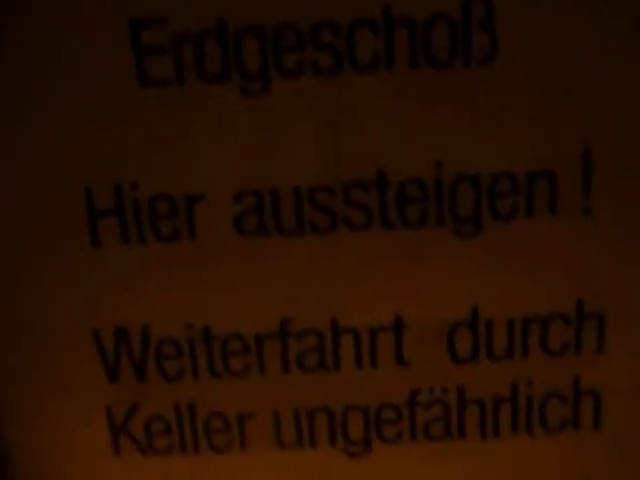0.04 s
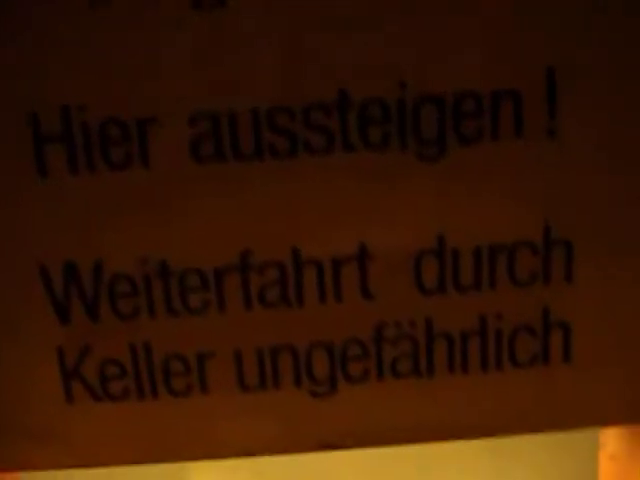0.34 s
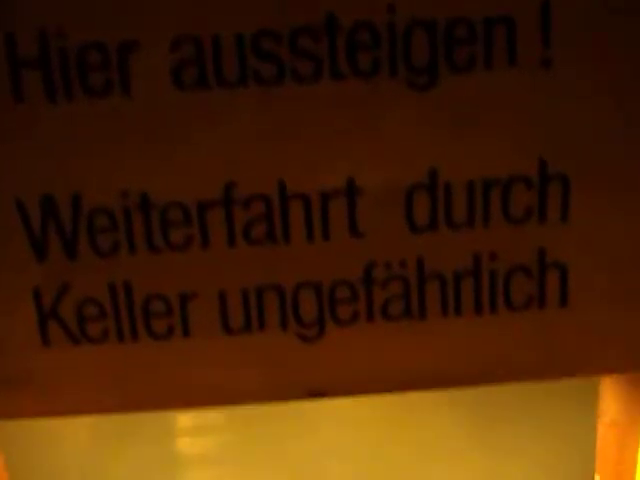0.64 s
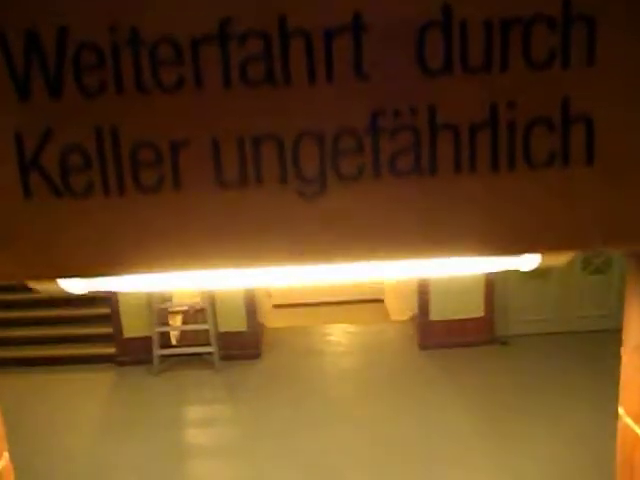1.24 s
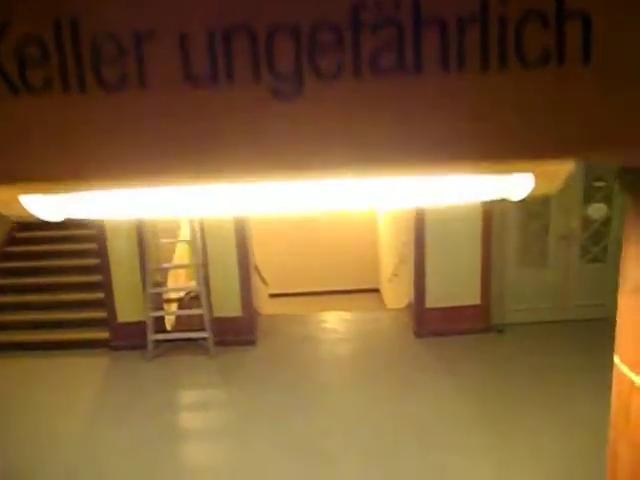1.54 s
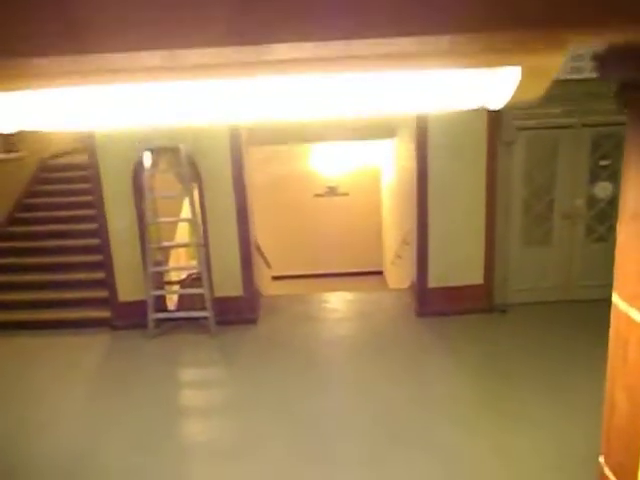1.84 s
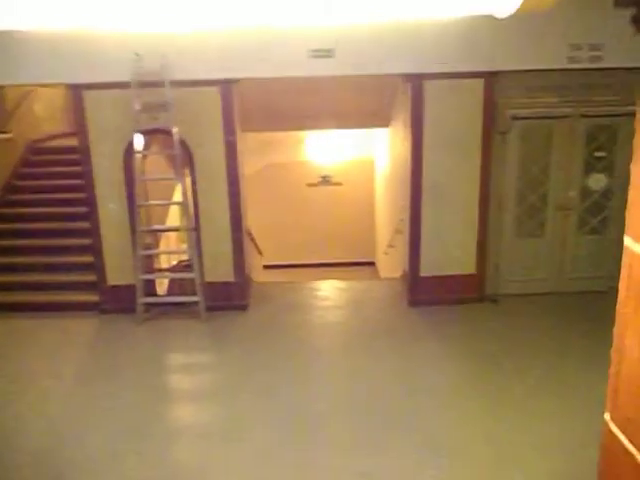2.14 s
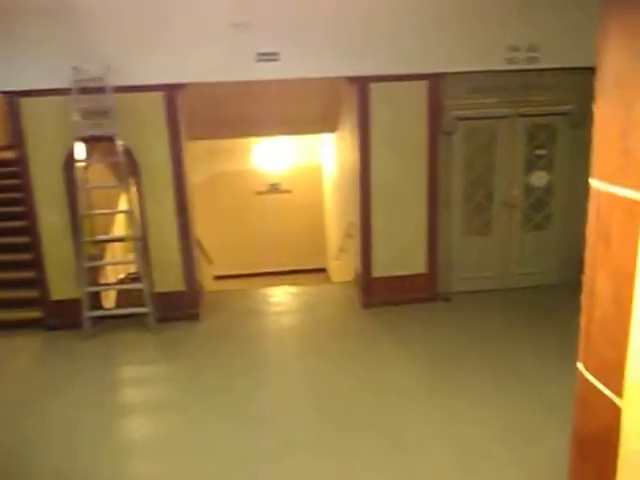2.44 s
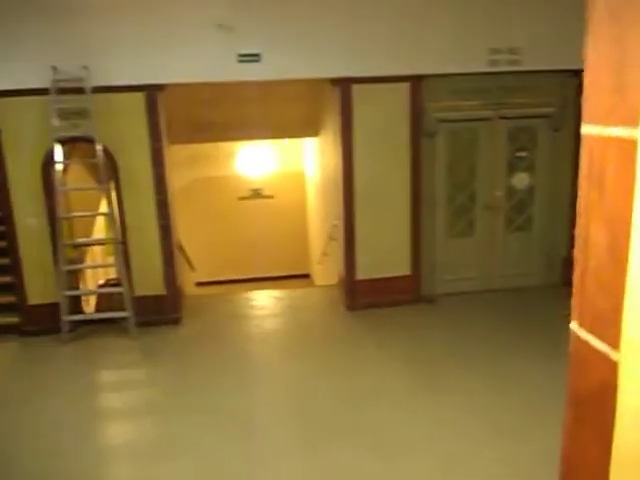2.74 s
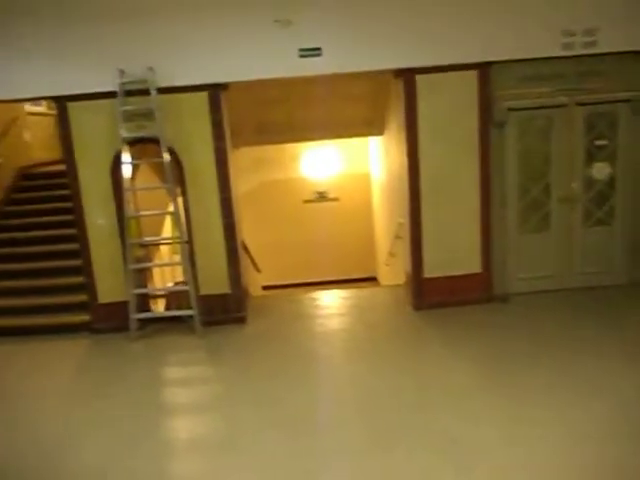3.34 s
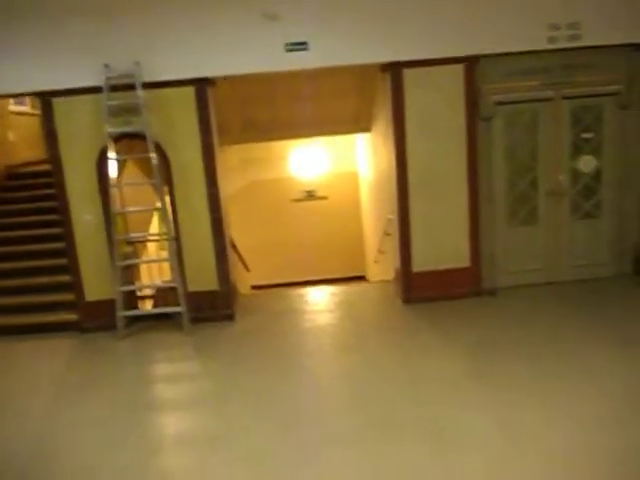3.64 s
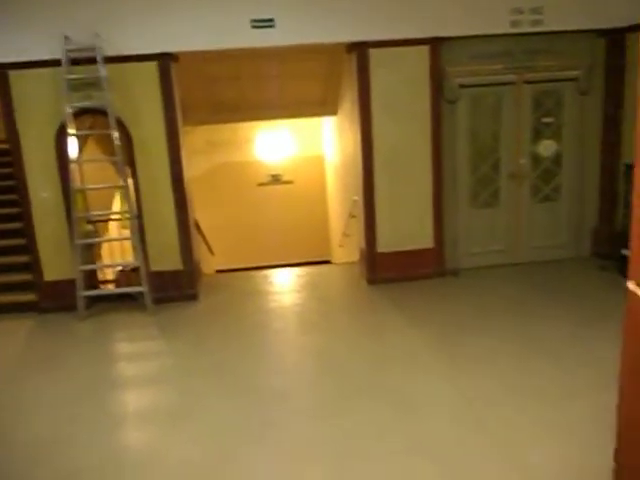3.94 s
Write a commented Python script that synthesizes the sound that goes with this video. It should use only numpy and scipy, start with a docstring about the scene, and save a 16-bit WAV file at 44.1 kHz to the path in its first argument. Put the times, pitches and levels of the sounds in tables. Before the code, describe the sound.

An open wooden lift rumbles and rattles steadily, heard from inside the cabin. Distant knocks echo in the shaft, then the cabin thuds in its guides, with faint scuffs and one dry snap close by near the end.

```python
"""Riding an open wooden lift

The microphone is in the cabin of a continuously running lift, passing a stone hall. The swaying cabin
rumbles, chain and guides rattle, and the drive whines faintly. Distant knocks echo down the shaft, then
the cabin itself thuds in its guides. Close by are short scuffs, a snap and two faint squeaks over a
soft hiss; the camera adds a thin buzz and three ticks."""
import sys
import numpy as np
from scipy import signal
from scipy.fft import rfft, irfft
from scipy.io import wavfile
from scipy.ndimage import uniform_filter1d

SR = 44100
rng = np.random.default_rng(int(sys.argv[2]) if len(sys.argv) > 2 else 0)


def unload_audio(sound):
    """Save the sound as a 16-bit wav file, at the path given as the first command line argument."""
    columns = np.transpose(np.atleast_2d(sound))
    # keep every value between -1 and 1, then stretch to whole-number steps
    steps = np.round(np.clip(columns, -1, 1) * 32767)
    wavfile.write(sys.argv[1], SR, steps.astype(np.int16))


N = 176400
TIME = np.arange(N) / SR
BIN_HZ = np.arange(N // 2 + 1) * SR / N

# How the continuous sounds rise and fall. Each row: time in seconds, relative level in dB.
HISS_LEVELS = [(0, -62), (1.5, -61.5), (1.65, -59.5), (2.0, -59), (2.25, -55.5), (2.6, -57), (2.9, -58.5),
               (3.1, -60), (3.2, -56), (3.5, -60), (3.7, -58), (4, -56)]
WHINE_LEVELS = [(0, -67), (.1, -58.5), (.5, -65.5), (.8, -63), (1.15, -55), (1.25, -64), (1.8, -61),
                (2.2, -63.5), (2.45, -52.5), (2.56, -71), (2.9, -59), (3.2, -73), (4, -76)]
RATTLE_LEVELS = [(0, -40.5), (.8, -43), (1.25, -39), (1.45, -41), (1.95, -37.5), (2.4, -37.5), (2.9, -38),
                 (3.1, -40.5), (3.5, -34), (4, -33)]
SWAY_LEVELS = [(0, -20.5), (.07, -20), (.3, -21), (.47, -25.5), (.57, -13.5), (.69, -32.5), (.77, -21),
               (1.05, -24.5), (1.17, -20), (1.45, -27), (1.52, -21), (2.02, -24), (2.1, -24), (2.27, -20),
               (2.35, -17), (2.44, -19.5), (2.75, -21), (3.14, -25), (3.2, -13.5), (3.55, -15.5), (4, -23)]

# The colour of each noise at the microphone. Each row: frequency in Hz, relative density in dB.
HISS_SPECTRUM = [(500, 9.5), (1500, -1.5), (2200, 0.5), (4000, 0), (6800, -0.5), (8500, -5), (10500, -7),
                 (12000, -21.5)]
SCUFF_SPECTRUM = [(400, -29), (1200, 2), (1900, -0.5), (2800, 6), (4000, 5), (5000, 2.5), (7000, 1.5),
                  (9000, -9), (11500, -28.5)]
SNAP_SPECTRUM = [(600, 6), (1500, -3.5), (2800, 2), (4000, 3.5), (5000, -0.5), (7300, -2.5), (8800, -15),
                 (11500, -24)]
HALL_SPECTRUM = [(800, -1), (1600, -1), (2400, 5.5), (4000, 1), (7000, -1.5), (8200, -14), (11000, -26)]
RATTLE_SPECTRUM = [(45, -22), (75, -0.5), (100, 2), (125, -8), (155, 1), (200, -5.5), (260, -5.5),
                   (320, -11.5), (420, -12), (550, -20.5), (1000, -25), (1400, -38), (2500, -49)]
SWAY_SPECTRUM = [(12, -5.5), (20, -0.5), (27, 3), (33, -2), (39, -1.5), (48, 1.5), (57, -0.5), (66, -15),
                 (80, -25), (200, -77)]
CLACK_SPECTRUM = [(150, -15), (400, 3.5), (600, 5.5), (700, 4), (800, 11), (900, 1.5), (1100, 2.5),
                  (1400, -13.5), (1900, -24.5), (3300, -22), (7000, -39)]
BOOM_SPECTRUM = [(80, -8), (160, -6.5), (270, 0), (390, -5.5), (520, -14.5), (900, -25), (1500, -41)]
FRAME_SPECTRUM = [(30, -20), (60, -1), (85, 0), (125, -14), (160, -9.5), (210, -18), (400, -34), (900, -55)]
PANEL_SPECTRUM = [(90, -7.5), (160, 0.5), (260, 1.5), (370, -1.5), (550, -11), (900, -18), (1500, -32.5),
                  (3000, -44)]

# The camera's buzz. Each row: frequency in Hz, level in dB while switched on.
BUZZ_TONES = [(10590, -87), (10750, -71), (11305, -78.5)]
# Electrical ticks. Each row: start in seconds, step height in dB before softening.
CAMERA_TICKS = [(3.2084, -13.5), (3.2126, -17), (3.3088, -24)]
# The motor's steady tones. Each row: frequency in Hz, level in dB, pitch wander in Hz.
MOTOR_TONES = [(152, -48, 6.11), (377.7, -60, 4), (2457, -84, 8.6)]
# Two squeaks close by, one list for each. Each row: time in seconds, pitch in Hz.
SQUEAK_GLIDES = [
    [(0, 8040), (.13, 8050), (.16, 9300), (.185, 9100), (.22, 7750), (.29, 7300), (.37, 6150)],
    [(2.47, 8160), (2.55, 8400), (2.63, 8200), (2.76, 8900), (2.82, 9900), (2.87, 8000)],
]
# Scuffs close by. Each row: start in seconds, level in dB, rise in seconds, time to fall 60 dB in
# seconds, tilt in dB per octave.
NEAR_SCUFFS = [(1.555, -44.5, 0.0015, 0.12, 15.5), (1.84, -46.5, 0.029, 0.16, 2),
               (2.056, -45, 0.026, 0.2, 4), (2.32, -46.5, 0.052, 0.12, 2), (2.705, -47.5, 0.01, 0.28, -2),
               (3.237, -45, 0.029, .11, -1), (3.409, -45, 0.0073, 0.19, -2.5),
               (3.759, -43.5, 0.0025, .07, 2), (3.768, -45, 0.026, 0.17, 1)]
# Knocks far off in the shaft. Each row: start in seconds, clack level in dB, boom level in dB.
SHAFT_KNOCKS = [(-.08, -60, -42), (0.226, -39.5, -29), (0.546, -44, -36.5), (0.883, -38, -31),
                (1.19, -53, -36.5), (1.602, -47.5, -39.5), (2.223, -51, -33.5), (2.70, -73, -38.5),
                (3.162, -43, -71), (3.30, -63, -34.5), (3.501, -40, -33), (3.834, -39, -40),
                (3.935, -44, -52)]
# The shaft's ring after every knock. Each row: frequency in Hz, relative level in dB, half-width in Hz.
SHAFT_RESONANCES = [(189.5, -7.5, 13), (250.7, -5.5, 21), (297, -8, 6.8), (372.6, -4.5, 21),
                    (432, -12.5, 20)]
# The cabin's thuds. Each row: start in seconds, frame level in dB, panel level in dB, rise in seconds.
CABIN_THUDS = [(1.603, -49, -30.5, 0.016), (2.054, -26.5, -27.5, 0.0072), (2.297, -27, -38, 0.011),
               (2.56, -31.5, -50, 0.026), (2.73, -36.5, -39.5, 0.016), (2.93, -24, -45, 0.023),
               (3.178, -23, -33, 0.017), (3.264, -26.5, -53, 0.022), (3.341, -20.5, -32.5, 0.018),
               (3.415, -25.5, -33, 0.018), (3.67, -28, -44, .015), (3.789, -29, -41, 0.018)]


def from_db(db):
    """Decibels to gain."""
    return 10 ** (np.asarray(db) / 20)


def level(rows):
    """Gain over time through (seconds, dB) points."""
    return from_db(np.interp(TIME, *np.transpose(rows)))


def shaped_noise(gain):
    """Noise of unit RMS, weighted by one gain for each frequency bin."""
    x = irfft(rfft(rng.standard_normal(N)) * gain, N)
    return x / np.sqrt(np.mean(x ** 2) + 1e-20)


def noise(spectrum, tilt_db=0):
    """Unit noise of the given colour, tilted per octave and falling away beyond the table's ends."""
    hz, db = np.transpose(spectrum)
    octave, points = np.log2(np.maximum(BIN_HZ, 1)), np.log2(hz)
    octaves_outside = np.abs(octave - np.clip(octave, points[0], points[-1]))
    colour_db = np.interp(octave, points, db) + tilt_db * octave - 20 * octaves_outside
    return shaped_noise(from_db(colour_db))


def resonance(centre_hz, half_width_hz):
    """Unit noise ringing in one resonance."""
    return shaped_noise(1 / (1 + ((BIN_HZ - centre_hz) / half_width_hz) ** 2))


def drift(rate_hz):
    """Random wander of unit RMS, mostly slower than the given rate."""
    return resonance(0, rate_hz)


def even(x, window_s=0.039):
    """Hold a noise near unit level by ironing out its slow swells."""
    size = int(window_s * SR)
    power = uniform_filter1d(uniform_filter1d(x ** 2, size), size)
    return x / np.sqrt(power + 1e-9)


def swell(start_s, rise_s, t60_s):
    """A straight rise, then an exponential decay of 60 dB in t60_s."""
    age = TIME - start_s
    return np.clip(age / rise_s, 0, 1) * from_db(-60 * np.maximum(age - rise_s, 0) / t60_s)


def gate(clock, start_s, end_s, edge_s):
    """Open between start and end, with a straight fade at each edge."""
    return np.clip(np.minimum(clock - start_s, end_s - clock) / edge_s, 0, 1)


def tone(hz, wander_hz, rate_hz=12.8):
    """A sine of unit RMS whose pitch wanders at random."""
    pitch = hz + wander_hz * drift(rate_hz)
    return np.sqrt(2) * np.sin(2 * np.pi * np.cumsum(pitch) / SR)


def hiss():
    """A soft, wide hiss behind everything, a little louder in the second half."""
    return level(HISS_LEVELS) * noise(HISS_SPECTRUM)


def camera_buzz(rate_hz=40.74, duty=0.57):
    """Right at the microphone, the camera's thin, high tones switch on and off in a fast cycle."""
    age = (TIME - 0.006) % (1 / rate_hz)
    tones = sum(np.sqrt(2) * from_db(db) * np.sin(2 * np.pi * hz * age) for hz, db in BUZZ_TONES)
    return gate(age, 0, duty / rate_hz, edge_s=0.0025) * tones


def camera_ticks(decay_s=0.00043, soften_hz=7000):
    """Three electrical ticks from the camera, each a sudden step that leaks away."""
    steps = np.zeros(N)
    for start, db in CAMERA_TICKS:
        steps[int(start * SR)] = from_db(db)
    ticks = signal.lfilter([1], [1, -np.exp(-1 / (decay_s * SR))], steps + 1e-18)
    return signal.lfilter(*signal.butter(1, soften_hz, fs=SR), ticks)


def drive():
    """The drive, faint from the cabin: the motor's tones waver and the gear whine comes and goes."""
    motor = sum(from_db(db + 2 * drift(5.1)) * tone(hz, wander) for hz, db, wander in MOTOR_TONES)
    gears = level(WHINE_LEVELS) * tone(hz=929, wander_hz=1.88)
    return motor + gears


def squeaks(level_db=-72.5, flicker_db=3.5):
    """Faint, unsteady high tones close by that glide up and fall away."""
    sound = np.zeros(N)
    for glide in SQUEAK_GLIDES:
        times, hz = np.transpose(glide)
        squeak = tone(np.interp(TIME, times, hz), wander_hz=90, rate_hz=88)
        gain = from_db(level_db + flicker_db * drift(22))
        sound += gate(TIME, times[0], times[-1], edge_s=0.03) * gain * squeak
    return sound


def scuffs(grain_db=1.5):
    """Short rubs near the microphone, made grainy by a fast flicker in level."""
    rubs = sum(from_db(db) * swell(start, rise, t60) * noise(SCUFF_SPECTRUM, tilt)
               for start, db, rise, t60, tilt in NEAR_SCUFFS)
    return rubs * from_db(grain_db * drift(330))


def snap(start_s=3.527):
    """One dry crack close by, answered by the stone hall."""
    crack = from_db(-30.5) * swell(start_s, rise_s=0.0032, t60_s=0.094) * noise(SNAP_SPECTRUM)
    hall = from_db(-47) * swell(start_s, rise_s=0.0092, t60_s=0.92) * noise(HALL_SPECTRUM)
    return crack + hall


def cabin_rumble(sway_trim_db=-0.43, rattle_flicker_db=1.5):
    """Around the microphone the cabin sways on two deep resonances while chain and guides rattle."""
    sway = level(SWAY_LEVELS) * even(noise(SWAY_SPECTRUM), window_s=0.27)
    rattle = level(RATTLE_LEVELS) * even(noise(RATTLE_SPECTRUM))
    return from_db(sway_trim_db) * sway + from_db(rattle_flicker_db * drift(13)) * rattle


def shaft_knocks(boom_delay_s=0.0067):
    """Each distant knock arrives as a blurred clack, then a boom builds in the shaft's resonances."""
    clack_gain, boom_gain = np.zeros((2, N))
    for start, clack_db, boom_db in SHAFT_KNOCKS:
        clack_gain += from_db(clack_db) * swell(start, rise_s=0.0096, t60_s=0.43)
        boom_gain += from_db(boom_db) * swell(start + boom_delay_s, rise_s=0.092, t60_s=0.39)
    diffuse = from_db(-5) * noise(BOOM_SPECTRUM)
    ringing = sum(from_db(db) * resonance(hz, half_width) for hz, db, half_width in SHAFT_RESONANCES)
    return clack_gain * even(noise(CLACK_SPECTRUM)) + boom_gain * even(diffuse + ringing)


def cabin_thuds():
    """Bumps in the guides shake the dense modes of the frame and the wall panels around the microphone."""
    frame_gain, panel_gain = np.zeros((2, N))
    for start, frame_db, panel_db, rise in CABIN_THUDS:
        frame_gain += from_db(frame_db) * swell(start, rise, t60_s=0.53)
        panel_gain += from_db(panel_db) * swell(start, rise, t60_s=0.25)
    return frame_gain * even(noise(FRAME_SPECTRUM)) + panel_gain * even(noise(PANEL_SPECTRUM))


def scene():
    """Everything at one microphone riding in the cabin."""
    lift = cabin_rumble() + drive() + shaft_knocks() + cabin_thuds()
    close_by = scuffs() + hiss() + snap() + squeaks()
    return (lift + close_by + camera_buzz() + camera_ticks())[None]


def record(dry, cutoff_hz=11750):
    """The microphone's signal fades briefly at both ends, and its top is cut steeply."""
    fades = gate(TIME, 0, TIME[-1], edge_s=0.006)
    low_pass = signal.ellip(10, 0.2, 80, cutoff_hz, fs=SR, output="sos")
    return signal.sosfilt(low_pass, dry * fades)


dry = scene()
out = record(dry)
unload_audio(out)
```